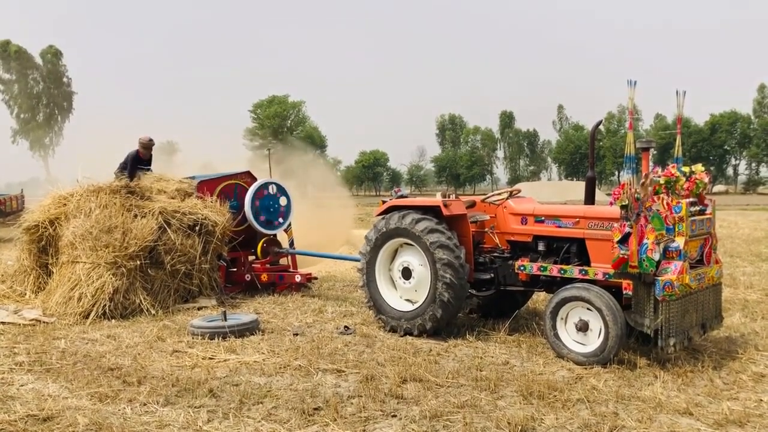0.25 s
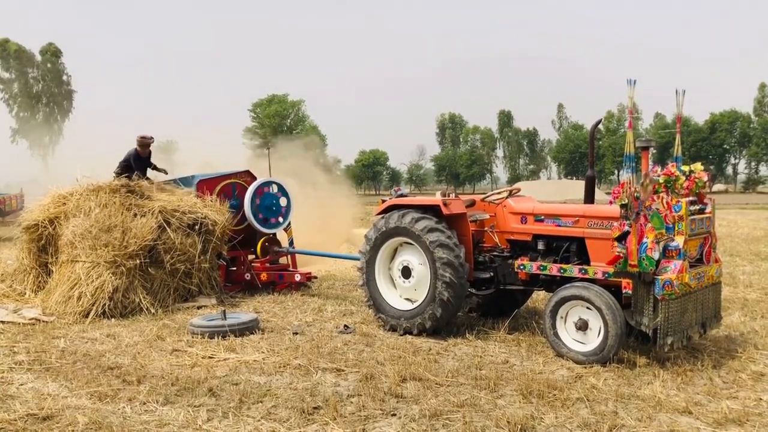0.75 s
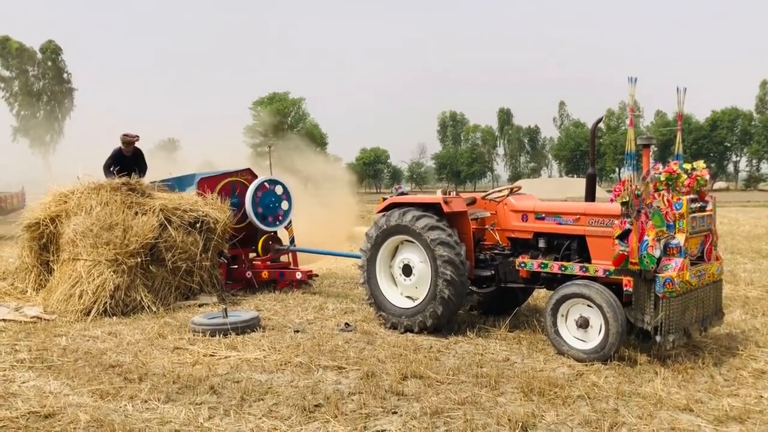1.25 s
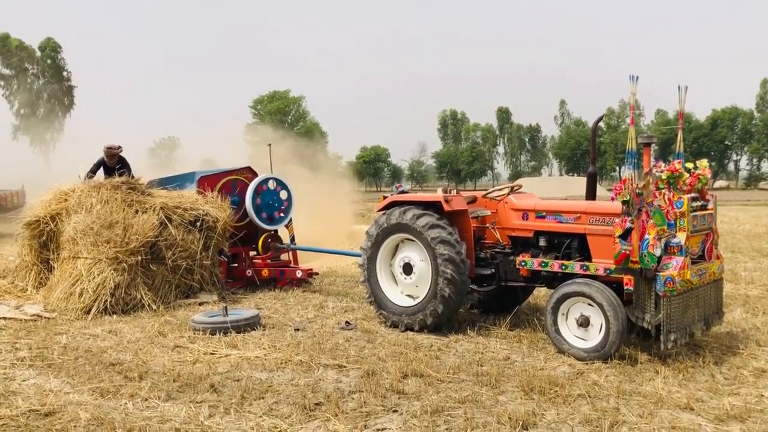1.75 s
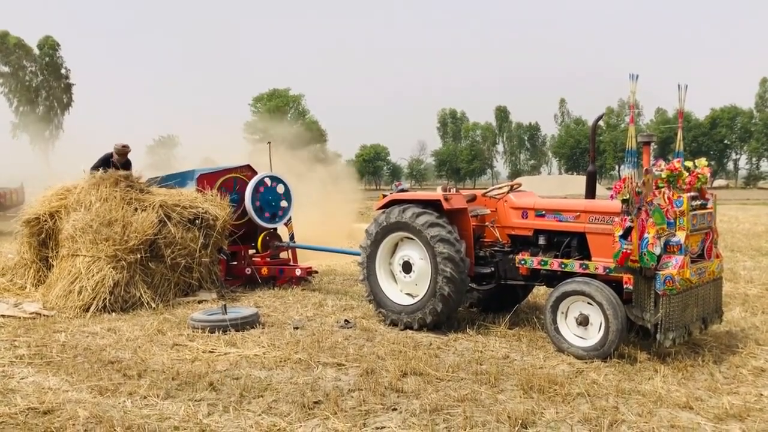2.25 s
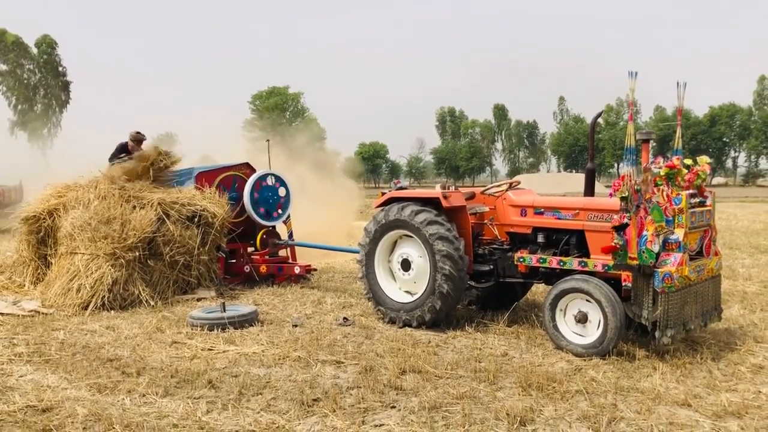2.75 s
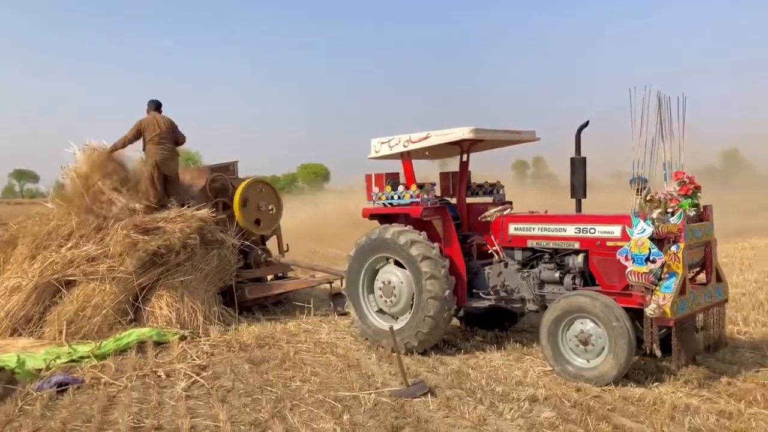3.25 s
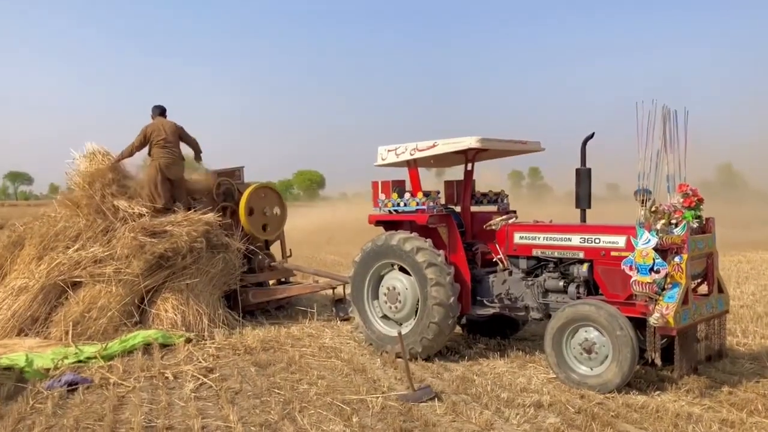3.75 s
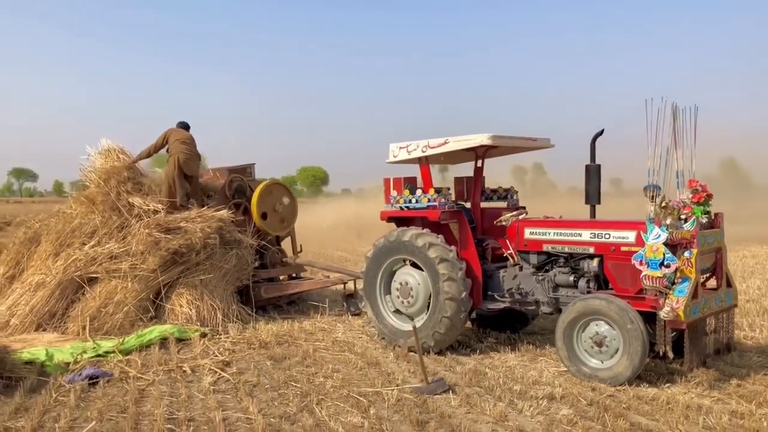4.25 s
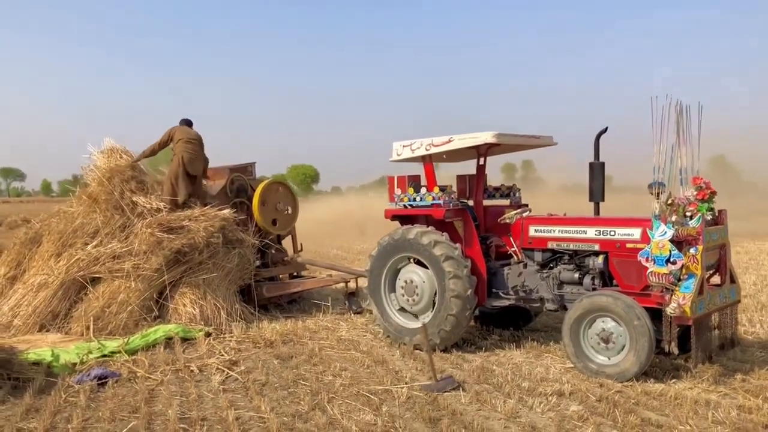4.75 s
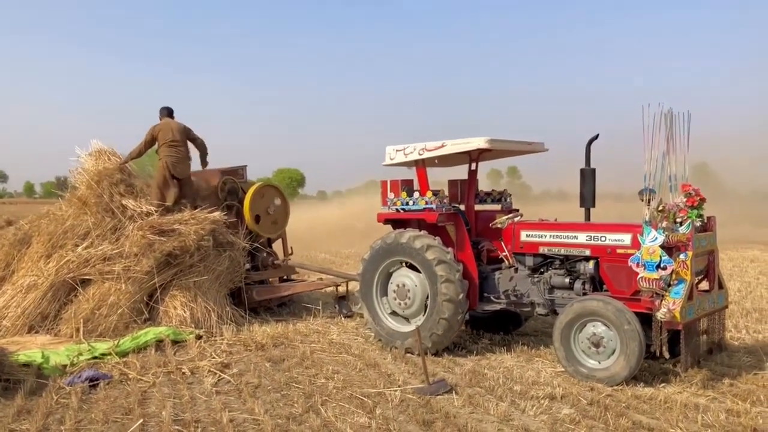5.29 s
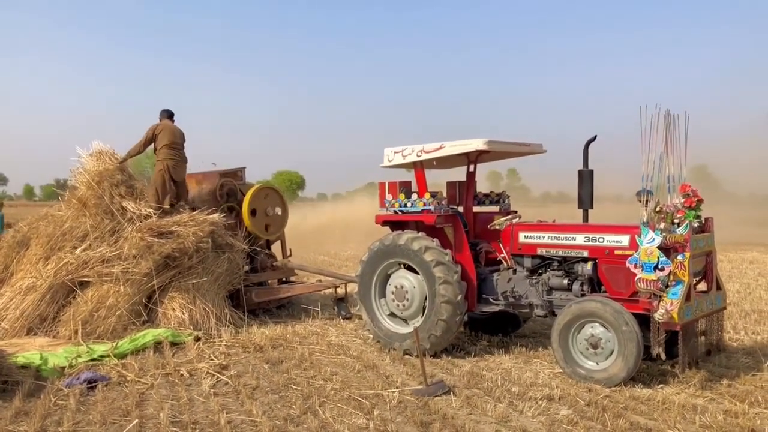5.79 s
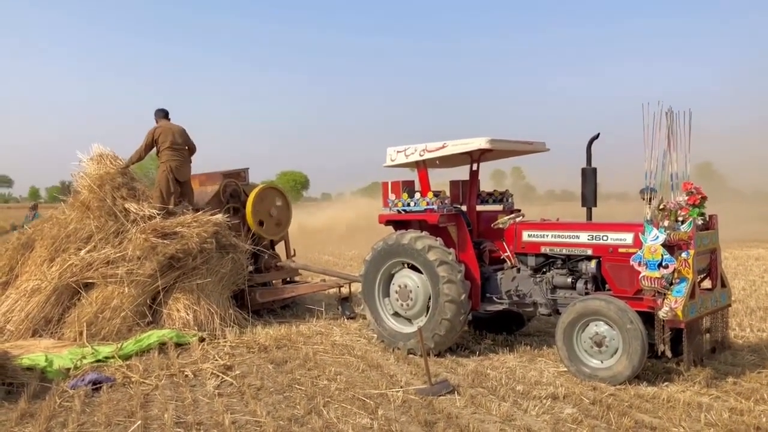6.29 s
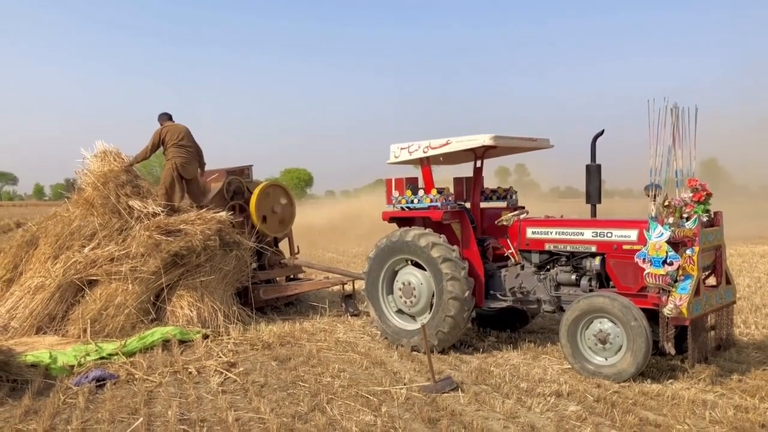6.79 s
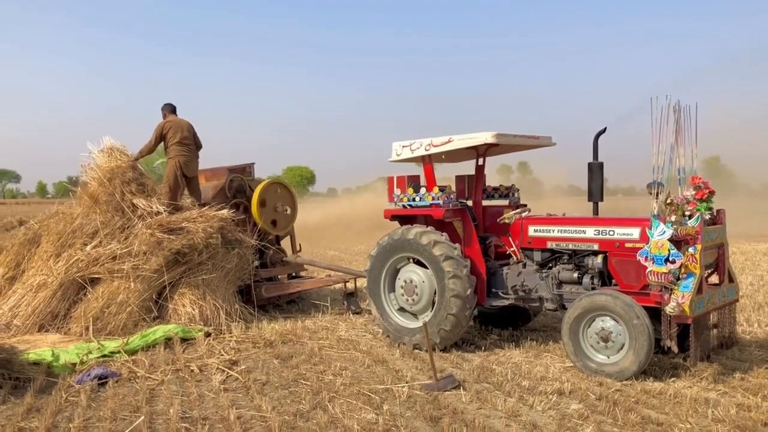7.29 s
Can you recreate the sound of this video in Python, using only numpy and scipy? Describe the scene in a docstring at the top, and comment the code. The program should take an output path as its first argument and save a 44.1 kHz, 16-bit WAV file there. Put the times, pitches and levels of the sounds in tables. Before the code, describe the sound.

A diesel tractor drives a threshing machine with a throbbing roar and gear whine, then abruptly gives way to a much quieter, humming one.

```python
"""Throbbing exhaust, gear whine, a roar and a droning drum: a close three-cylinder diesel tractor drives a
wheat thresher in an open field. Firing pulses the rumble, roar and clatter; drum and exhaust tones beat. Load
drags the speed down and swells the exhaust. At 3.16 s, abruptly, a second, much softer rig takes over: humming
drum, light knock, a ringing panel, a hiss of chopped straw."""
import sys
import numpy as np
from scipy import signal
from scipy.fft import rfft, irfft, next_fast_len
from scipy.io import wavfile
from scipy.ndimage import map_coordinates

SR = 44100
rng = np.random.default_rng(int(sys.argv[2]) if len(sys.argv) > 2 else 0)


def wav_out(sig):
    """Save sig, one row per channel (or a flat mono array), as 16-bit PCM at SR to the path in sys.argv[1]."""
    wavfile.write(sys.argv[1], SR, np.round(np.clip(np.atleast_2d(sig).T, -1, 1) * 32767).astype(np.int16))


N = 332073

SWITCH_S, TOP_HZ = 3.1553, 15740
THROB_S = .054  # drum and exhaust in step; they beat at almost 4 Hz
LOUD_LOAD_DB, SOFT_LOAD_DB = 2.4, 2.8  # exhaust tones' gain at full load; drum and rumble get half

# four-stroke cycle rate: t/s, f/Hz
LOUD_CYCLE_HZ = [(0.0, 15.581), (0.75, 15.76), (1.13, 15.717), (1.43, 15.351), (1.75, 15.096),
                 (2.2, 15.099), (3.1, 15.41)]
SOFT_CYCLE_HZ = [(3.2, 15.041), (4.6, 15.346), (5.7, 15.459), (6.2, 15.352), (7.15, 14.815), (7.5, 14.801)]
# engine tones, no load: multiple of cycle rate, level/dB
LOUD_EXHAUST_TONES = [(3, -36), (6, -29.3), (7, -33), (9, -42)]
LOUD_BLOCK_TONES = [(15, -37), (20, -45), (24, -43), (26, -42.5), (29, -41.5), (42, -41.5), (45, -40.5)]
SOFT_EXHAUST_TONES = [(3, -58), (6, -46.5), (8, -56.5), (9, -51.5), (12, -43.3)]
SOFT_GEAR_TONES = [(50, -55), (54, -59.5), (64, -58), (96, -62), (100, -60), (150, -72)]
# gear mesh: multiple of cycle rate, no-load level/dB, full-load gain/dB
LOUD_GEAR_TONES = [(51, -45, 14.2), (52, -28.2, -5), (78, -34, 1.6)]
# thresher rotors, no load: multiple of rotor beat rate, level/dB
LOUD_DRUM_TONES = [(2, -30), (3, -34.8), (5, -48), (6, -42), (7, -47)]
LOUD_FAN_TONES = [(1, -33.5), (2, -49.5)]
SOFT_DRUM_TONES = [(1, -43), (2, -44.5), (3, -55.5), (4, -60.5), (5, -50), (8, -68.5), (10, -68)]
# faint gear tone and its octave: harmonic, level/dB
SOFT_GEAR_HUM_TONES = [(1, -58), (2, -58.5)]
# combustion knock per cylinder: relative level/dB
LOUD_KNOCK_DB = [-8.5, 2.05, -0.25]
SOFT_KNOCK_DB = [0, -1, 0]
# noise spectra: f/Hz, relative level/dB
BLOCK_BUZZ_SHAPE = [(250, 1.5), (430, 4), (500, -16), (820, -10), (950, -2.5), (1100, -2), (1300, -12.5),
                    (1900, -49.5)]
LOUD_RUMBLE_SHAPE = [(20, -34), (30, -18), (42, -8.5), (65, 4.5), (105, -1), (200, 0.5), (320, -4.5),
                     (480, -15), (700, -36.5)]
LOUD_ROAR_SHAPE = [(200, -28), (400, -9), (520, -7.5), (650, -2.5), (810, -1.5), (900, -2.5), (1080, -4.5),
                   (1140, -7.5), (1250, -9.5), (1420, -16), (1640, -19), (1850, -27.5), (2200, -35),
                   (3500, -56)]
LOUD_CLATTER_SHAPE = [(1900, -8), (2230, -13.5), (2400, -5.5), (2600, -7), (2850, -7.5), (3150, -12.5),
                      (4200, -14), (4750, -22), (6000, -19.5), (7400, -24), (10100, -31), (11300, -42),
                      (15600, -39)]
SOFT_RUMBLE_SHAPE = [(20, -26), (30, -19), (45, -4), (70, 1), (130, 0.5), (200, -3.5), (260, -2.5),
                     (340, -4), (430, -10), (600, -29)]
SOFT_ROAR_SHAPE = [(300, -21), (470, -7), (600, -2.5), (730, -1), (830, -4), (950, -9.5), (1060, -12),
                   (1230, -8.5), (1550, -9.5), (1700, -11), (1810, -15.5), (1960, -10), (2350, -21.5),
                   (2700, -32)]
SOFT_CLATTER_SHAPE = [(1800, -16), (2350, -0.5), (2560, 5.5), (2800, 0.5), (3050, 0), (3350, -5),
                      (3900, -1.5), (4500, -4), (5300, -14), (8000, -16)]
CHAFF_SHAPE = [(4600, -17), (5400, -10), (6200, -3), (7500, -1), (8500, 0), (10200, -6.5), (11800, -5.5),
               (13000, -7), (14000, -9), (15600, -12.5)]
# narrow bright bands in the straw hiss: f/Hz, width/Hz, relative level/dB
HISS_BANDS = [(7700, 220, -5), (8430, 220, -4), (10800, 220, -7), (11400, 200, -1)]
# straw hiss envelope: t/s, relative level/dB
HISS_ENVELOPE = [(3.2, -64.5), (4.3, -64.5), (4.7, -66), (5.8, -66), (6.1, -65), (6.9, -64.8), (7.3, -66.5)]


def amp(db):
    """Decibels to gain."""
    return 10 ** (np.asarray(db) / 20)


def unit(x):
    """x at rms 1."""
    return x / np.sqrt(np.mean(x ** 2) + 1e-20)


def noise():
    """White noise."""
    return rng.standard_normal(N)


def curve(rows):
    """(t/s, value) rows interpolated per sample."""
    return np.interp(np.arange(N) / SR, *np.transpose(rows))


def wobble(rate_hz):
    """Smooth random curve, rate_hz knots a second."""
    coarse = np.arange(0, N, 64)
    knots = rng.standard_normal(int(N * rate_hz / SR) + 4)
    return np.interp(np.arange(N), coarse, map_coordinates(knots, [coarse * rate_hz / SR]))


def filtered(x, response):
    """Zero-phase filter of gain response(f/Hz)."""
    size = next_fast_len(N + SR // 2)
    return irfft(rfft(x, size) * response(np.fft.rfftfreq(size, 1 / SR)), size)[:N]


def coloured(x, shape):
    """x through a spectrum with 40 dB/octave skirts, at rms 1."""
    hz, db = np.transpose(shape)
    hz = np.r_[hz[0] / 2, hz, hz[-1] * 2]
    db = np.r_[db[0] - 40, db, db[-1] - 40]
    return unit(filtered(x, lambda f: amp(np.interp(np.log(f + 1), np.log(hz), db))))


def governor(speed, hunt):
    """Hunting, sagging engine: cycles since THROB_S, and load (0 at top speed, 1 at lowest)."""
    rate_hz = curve(speed)
    cycles = np.cumsum(rate_hz * (1 + hunt * wobble(14))) / SR
    load = (rate_hz.max() - rate_hz) / np.ptp(rate_hz)
    return cycles - cycles[round(THROB_S * SR)], load


def tones(cycles, lags, rows, waver_db, drift_rad, ratio=1):
    """Harmonics of a shaft at ratio beats a cycle. Near pitches share a path lag; all waver in the air."""
    out = np.zeros(N)
    for multiple, db in rows:
        order = np.round(multiple) * ratio
        phase = 2 * np.pi * (order * cycles + lags[round(order)]) + drift_rad * wobble(4.94)
        out += np.sqrt(2) * amp(db + waver_db * wobble(7)) * np.sin(phase)
    return out


def rattle(cycles, repeat):
    """Mechanical excitation: the power share repeat recurs each cycle, the rest is turbulence."""
    pattern = rng.standard_normal(2048)
    locked = unit(map_coordinates(pattern, [cycles % 1 * len(pattern)], mode="grid-wrap"))
    return np.sqrt(repeat) * locked + np.sqrt(1 - repeat) * noise()


def firing(cycles, knock_db, depth, decay_strokes):
    """Combustion envelope: one decaying burst per cylinder per cycle."""
    strokes = cycles * len(knock_db)
    cylinder = strokes.astype(int) % len(knock_db)
    burst = amp(knock_db)[cylinder] * np.exp(-(strokes % 1) / decay_strokes)
    return unit(1 + depth * burst)


def straw_ticks(rate_hz, spread_db):
    """Stalks and grain striking sheet metal at random."""
    return unit((rng.random(N) < rate_hz / SR) * noise() * amp(spread_db * noise()))


def loud_engine(cycles, lags, load):
    """More fuel swells the exhaust's low orders; the block buzzes on every cycle harmonic."""
    exhaust = tones(cycles, lags, LOUD_EXHAUST_TONES, waver_db=1.4, drift_rad=.18)
    block = tones(cycles, lags, LOUD_BLOCK_TONES, waver_db=2.24, drift_rad=.25)
    buzz = amp(-33) * coloured(rattle(cycles, repeat=.95), BLOCK_BUZZ_SHAPE)
    return amp(LOUD_LOAD_DB * load) * exhaust + block + buzz


def loud_gears(cycles, lags, load):
    """Mesh whines and the top one's faint octave; uneven tooth load makes them flutter."""
    whine = sum(amp(load_db * load) * tones(cycles, lags, [(order, db)], waver_db=2, drift_rad=.42)
                for order, db, load_db in LOUD_GEAR_TONES)
    top_order = LOUD_GEAR_TONES[-1][0]
    octave = tones(cycles, lags, [(top_order, -66)], waver_db=2.5, drift_rad=1.7, ratio=2)
    return (whine + amp(5 * load) * octave) * amp(1.6 * wobble(35.52))


def loud_thresher(cycles, lags, load):
    """Drum and fan geared to the engine; the drum beats against the exhaust."""
    drum = tones(cycles, lags, LOUD_DRUM_TONES, waver_db=.5, drift_rad=.25, ratio=3.1215)
    fan = tones(cycles, lags, LOUD_FAN_TONES, waver_db=1.5, drift_rad=.36, ratio=11.383)
    return amp(.5 * LOUD_LOAD_DB * load) * drum + fan


def loud_combustion(cycles, load):
    """Firing pulses the exhaust rumble, the roar and a clatter mixed with straw ticks."""
    puffs = rattle(cycles, repeat=.062) * firing(cycles, LOUD_KNOCK_DB, depth=1.16, decay_strokes=.54)
    rumble_db = -26 + .5 * LOUD_LOAD_DB * load + 1.2 * wobble(7.93)
    rumble = amp(rumble_db) * coloured(puffs, LOUD_RUMBLE_SHAPE)
    churn = rattle(cycles, repeat=.29) * firing(cycles, LOUD_KNOCK_DB, depth=.42, decay_strokes=.35)
    roar = amp(-24) * coloured(churn, LOUD_ROAR_SHAPE)
    knocks = rattle(cycles, repeat=.17) + amp(-18.5) * straw_ticks(rate_hz=830, spread_db=1.5)
    knocks *= firing(cycles, LOUD_KNOCK_DB, depth=.71, decay_strokes=.38)
    clatter = amp(-55 + 1.5 * load) * coloured(knocks, LOUD_CLATTER_SHAPE)
    return rumble + roar + clatter


def loud_rig():
    """Close tractor and thresher, working hard."""
    cycles, load = governor(LOUD_CYCLE_HZ, hunt=.0008)
    lags = rng.random(200)
    return (loud_engine(cycles, lags, load) + loud_gears(cycles, lags, load)
            + loud_thresher(cycles, lags, load) + loud_combustion(cycles, load))


def soft_engine(cycles, lags, load):
    """Silenced exhaust hum swells with load; gear whine fades."""
    hum = tones(cycles, lags, SOFT_EXHAUST_TONES, waver_db=-.14, drift_rad=.15)
    whine = tones(cycles, lags, SOFT_GEAR_TONES, waver_db=1.5, drift_rad=.15)
    return amp(SOFT_LOAD_DB * load) * hum + amp(-7 * load) * whine


def soft_thresher(cycles, lags, load):
    """Humming drum and a faint gear tone with its octave."""
    drum = tones(cycles, lags, SOFT_DRUM_TONES, waver_db=1, drift_rad=.12, ratio=3.713)
    gear_hum = tones(cycles, lags, SOFT_GEAR_HUM_TONES, waver_db=1, drift_rad=.17, ratio=23.63)
    return amp(.5 * SOFT_LOAD_DB * load) * drum + gear_hum


def soft_combustion(cycles, load):
    """Smooth rumble; firing lightly pulses the roar and clatter."""
    rumble = amp(-44 + .5 * SOFT_LOAD_DB * load) * coloured(noise(), SOFT_RUMBLE_SHAPE)
    churn = rattle(cycles, repeat=.23) * firing(cycles, SOFT_KNOCK_DB, depth=.33, decay_strokes=.4)
    roar = amp(-44) * coloured(churn, SOFT_ROAR_SHAPE)
    knocks = rattle(cycles, repeat=.18) * firing(cycles, SOFT_KNOCK_DB, depth=.32, decay_strokes=.3)
    clatter = amp(-58.5) * coloured(knocks, SOFT_CLATTER_SHAPE)
    return rumble + roar + clatter


def band(x, hz, width_hz):
    """x through one narrow peak, at rms 1."""
    return unit(filtered(x, lambda f: 1 / (1 + (2 * (f - hz) / width_hz) ** 2)))


def panel(cycles, load):
    """A rattled panel rings louder as the engine speeds up."""
    return amp(-65 - 12 * load) * band(rattle(cycles, repeat=.3), hz=2540, width_hz=170)


def shimmer(x, depth_db, width_hz, life_s):
    """Narrow bands of a hiss swell and fade independently; rms 1."""
    hz, t, spectrum = signal.stft(x, SR, nperseg=1024)
    knots = rng.standard_normal((400, 100))
    grid = np.meshgrid(hz / width_hz, t / life_s, indexing="ij")
    gain_db = depth_db * map_coordinates(knots, grid, mode="mirror")
    return unit(signal.istft(spectrum * amp(gain_db), SR)[1][:N])


def straw_hiss(cycles):
    """Streaming chaff hisses; narrow bright bands in it swell and fade at random."""
    stream = noise() + amp(-8) * straw_ticks(rate_hz=1500, spread_db=4.5)
    stream *= firing(cycles, SOFT_KNOCK_DB, depth=.21, decay_strokes=.3)
    chaff = coloured(stream, CHAFF_SHAPE)
    bands = sum(amp(db + 2.7 * wobble(4.4)) * band(noise(), hz, width_hz)
                for hz, width_hz, db in HISS_BANDS)
    hiss = shimmer(chaff + amp(-11) * unit(bands), depth_db=2.2, width_hz=190, life_s=.35)
    return amp(curve(HISS_ENVELOPE) + 1.8) * hiss


def soft_rig():
    """Silenced tractor and thresher."""
    cycles, load = governor(SOFT_CYCLE_HZ, hunt=.00056)
    lags = rng.random(200)
    return (soft_engine(cycles, lags, load) + soft_thresher(cycles, lags, load)
            + soft_combustion(cycles, load) + panel(cycles, load) + straw_hiss(cycles))


def scene():
    """Loud rig, then a 2 ms crossfade with a small tick, then soft rig; mono."""
    remaining_s = SWITCH_S - np.arange(N) / SR
    blend = np.sin(np.pi / 2 * np.clip(remaining_s / .002, 0, 1)) ** 2
    tick = (remaining_s > 0) * np.exp(-np.abs(remaining_s) / .0005)
    return (blend * loud_rig() + (1 - blend) * soft_rig() + amp(-18) * tick)[None]


def record(dry):
    """6 ms fade-in; brick-wall low-pass at TOP_HZ."""
    fade_in = np.sin(np.pi / 2 * np.minimum(np.arange(N) / SR / .006, 1)) ** 2
    return np.array([filtered(channel * fade_in, lambda hz: hz < TOP_HZ) for channel in dry])


dry = scene()
out = record(dry)
wav_out(out)
```